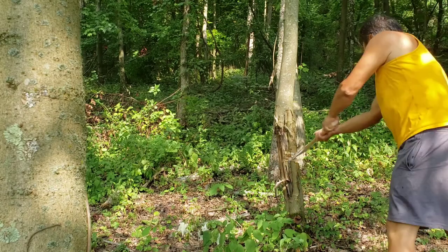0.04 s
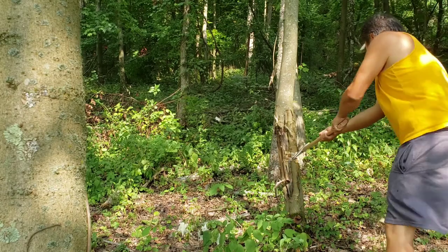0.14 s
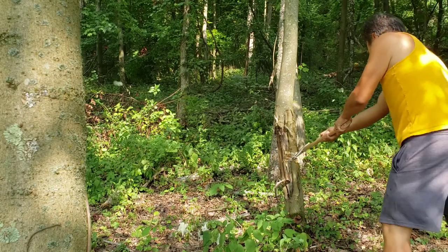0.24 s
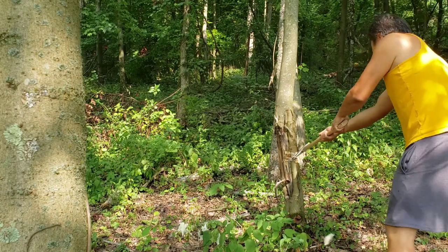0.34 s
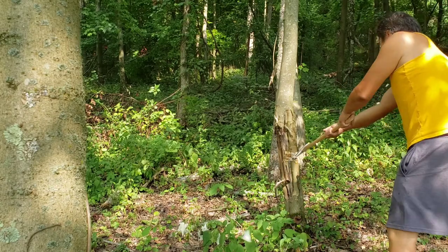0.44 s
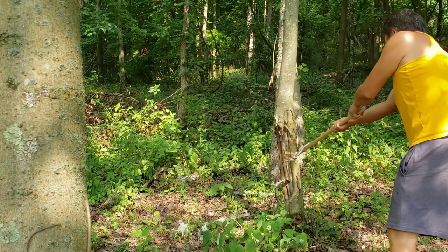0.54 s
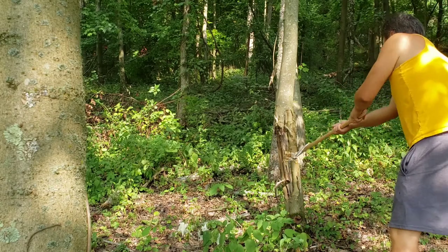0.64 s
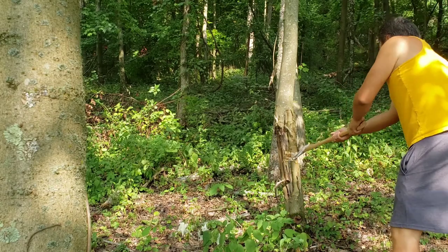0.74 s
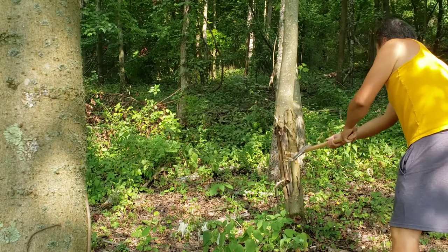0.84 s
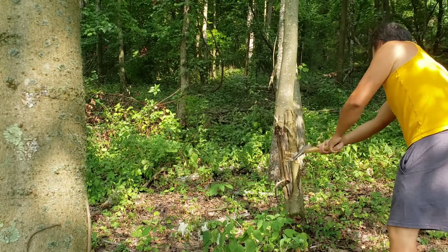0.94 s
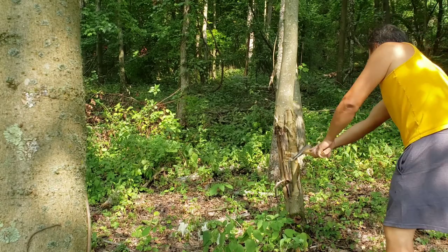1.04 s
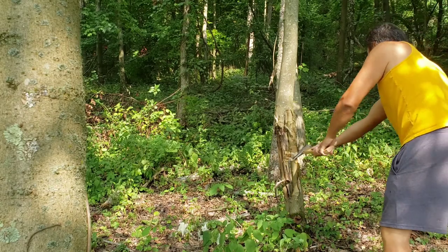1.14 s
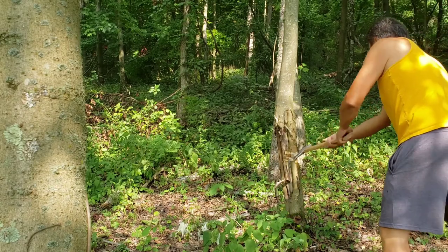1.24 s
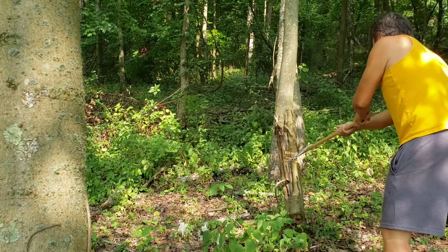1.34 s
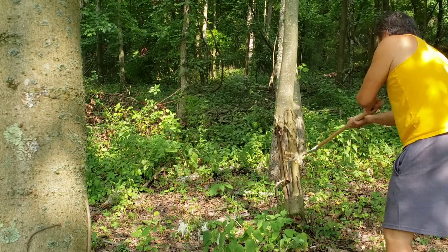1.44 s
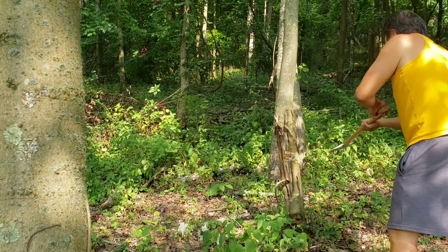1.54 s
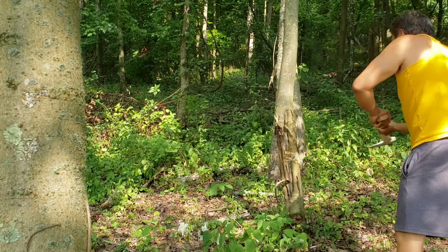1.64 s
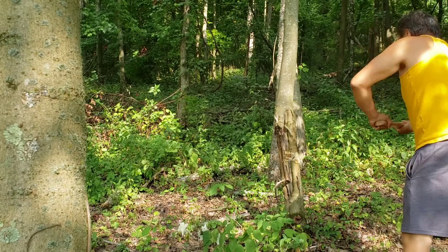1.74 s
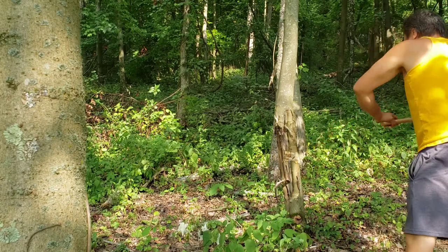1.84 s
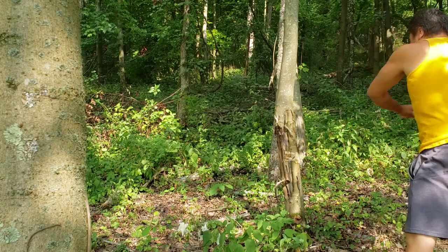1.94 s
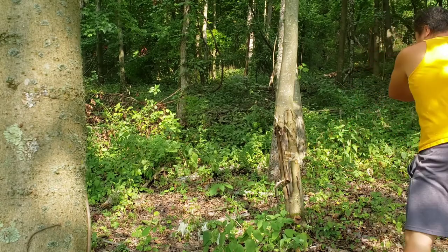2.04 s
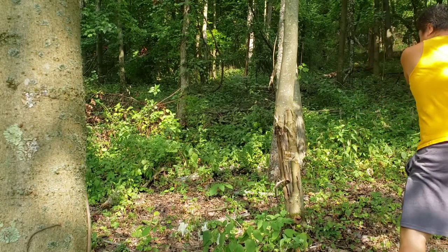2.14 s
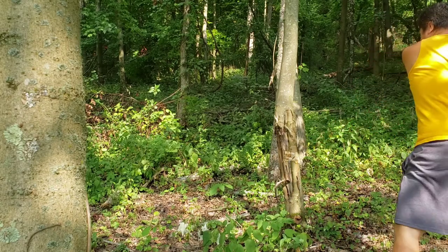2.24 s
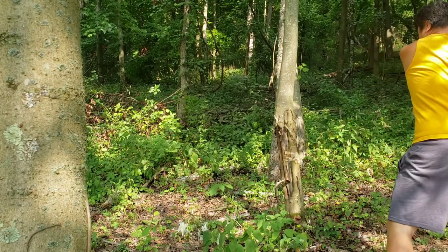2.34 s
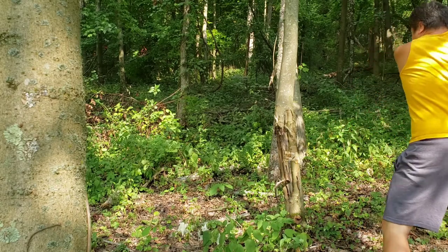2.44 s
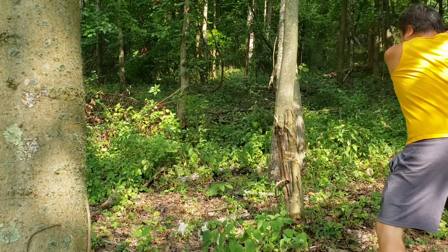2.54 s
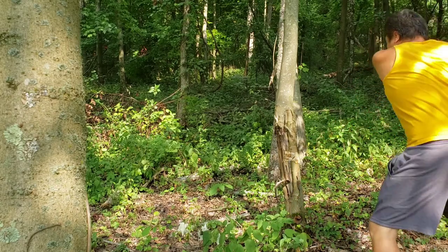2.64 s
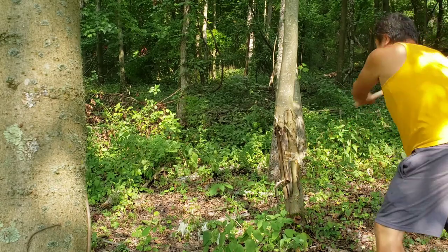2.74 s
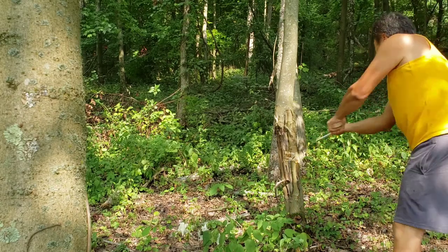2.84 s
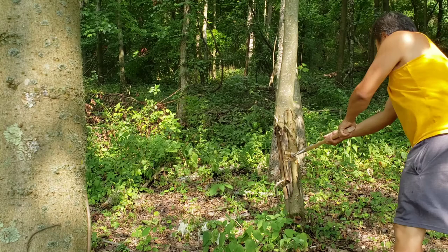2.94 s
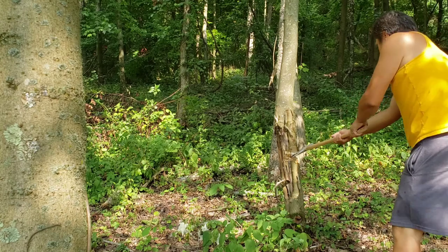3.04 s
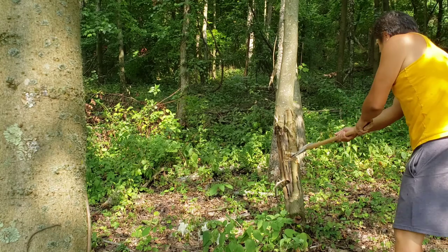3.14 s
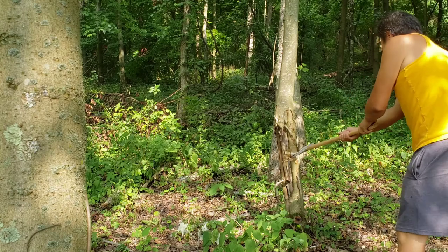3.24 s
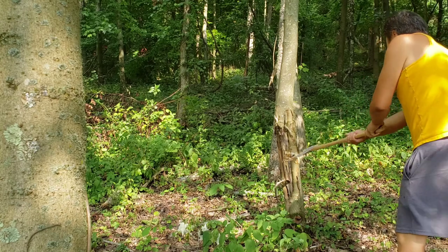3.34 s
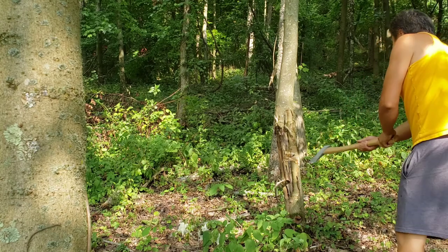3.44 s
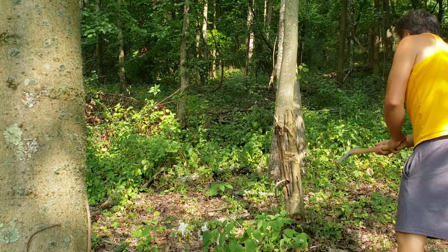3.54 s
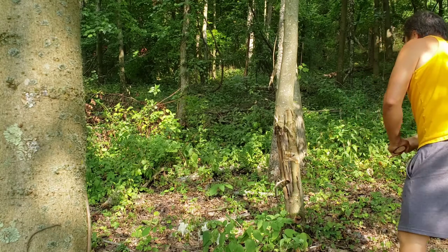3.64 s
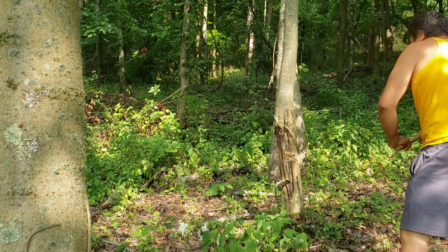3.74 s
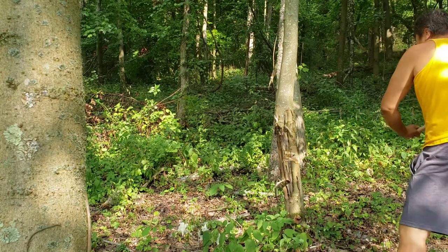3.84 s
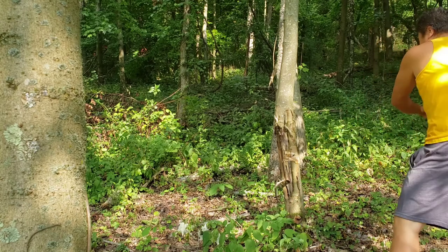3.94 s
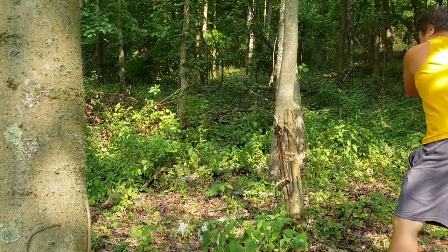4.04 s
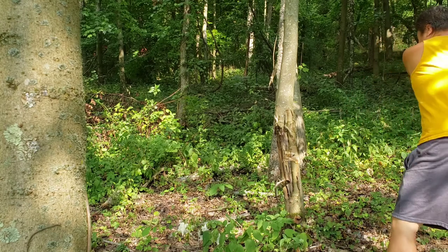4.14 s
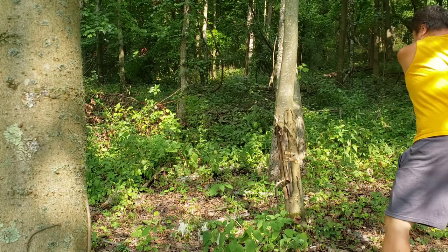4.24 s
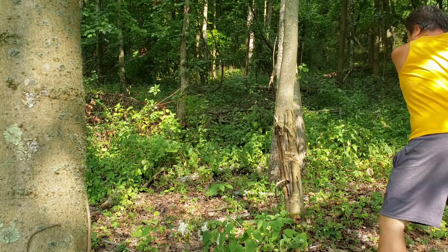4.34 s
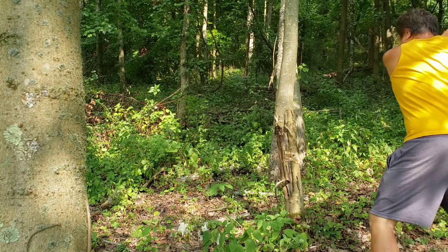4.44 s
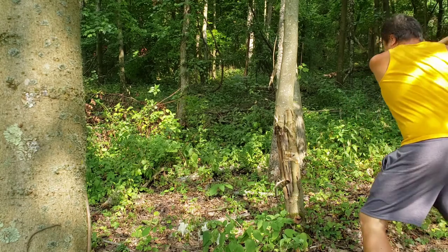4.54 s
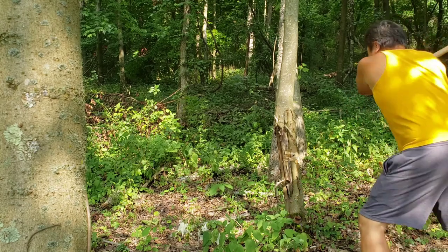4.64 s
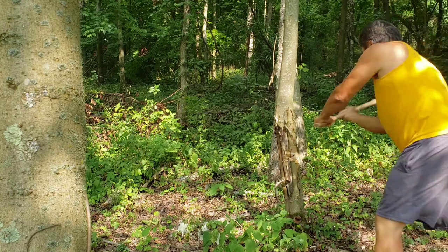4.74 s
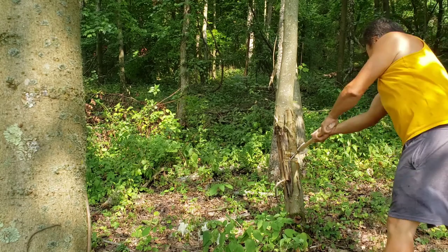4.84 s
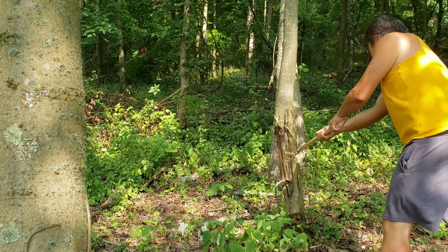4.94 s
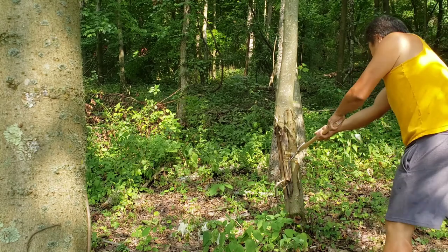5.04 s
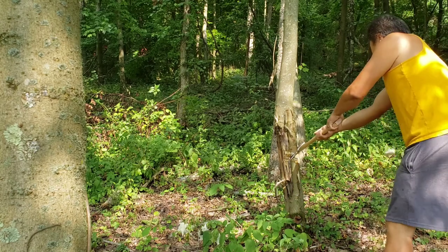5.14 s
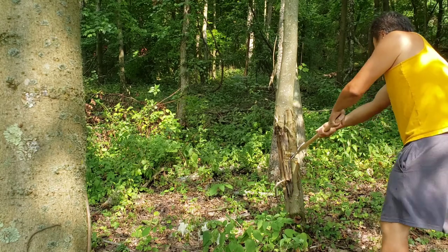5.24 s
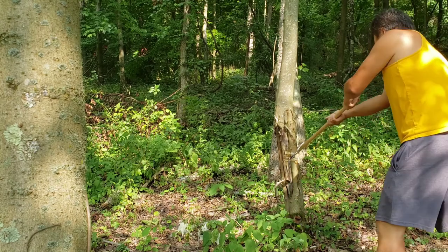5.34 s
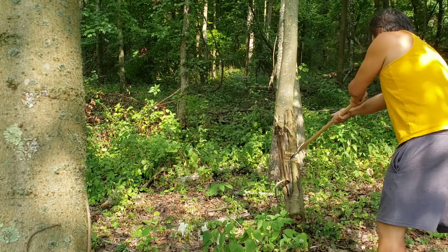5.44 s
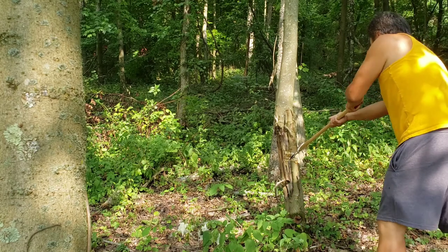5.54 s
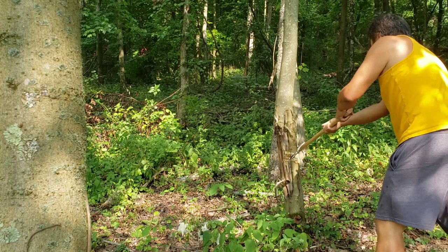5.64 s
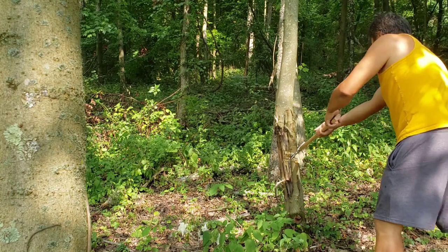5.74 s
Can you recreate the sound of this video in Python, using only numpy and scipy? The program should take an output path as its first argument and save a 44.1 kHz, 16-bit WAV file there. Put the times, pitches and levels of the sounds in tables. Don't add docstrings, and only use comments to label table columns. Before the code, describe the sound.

Three sharp axe chops into a thin trunk, spaced two to three seconds apart, echoing through quiet woods with faint leaf rustles between.

```python
import sys
import numpy as np
from scipy import signal
from scipy.fft import rfft, irfft
from scipy.io import wavfile
from scipy.ndimage import uniform_filter1d

SR = 44100
rng = np.random.default_rng(int(sys.argv[2]) if len(sys.argv) > 2 else 0)


def voltage_ratio(level):
    return 10 ** (np.asarray(level, float) / 20)


def unload_wav(signal):
    wavfile.write(
        sys.argv[1],
        SR,
        np.round(np.clip(np.atleast_2d(signal).T, -1, 1) * 32767).astype(np.int16),
    )


N = 254898


def evened(x):
    return x / np.sqrt(np.mean(x ** 2) + 1e-20)


def read(points, hz, col=1):
    table = np.transpose(points)
    return np.interp(np.log(hz + 1), np.log(table[0] + 1), table[col])


def tilt(hz, db_per_octave, pivot_hz):
    return db_per_octave * np.log2(np.clip(hz, 300, None) / pivot_hz)


def add(mix, s, sound):
    part = mix[..., round(s * SR):][..., :sound.shape[-1]]
    part += sound[..., :part.shape[-1]]


# frequency [Hz], left-right likeness [-1 to 1].
LIKENESS = [(60, 0.95), (180, 0.82), (550, 0.29), (1650, -0.025), (4970, 0.2), (15000, 0.03)]


def pair(size, length, lean):
    frames, hz = 4 * length // size + 5, np.fft.rfftfreq(size, 1 / SR)
    a, b, c, d = rng.standard_normal((frames, len(hz), 4)).T
    same = np.clip(read(LIKENESS, hz), -1, 1)[:, None]
    left = a + 1j * b
    right = same * left + np.sqrt(1 - same ** 2) * (c + 1j * d)
    side = voltage_ratio(read(lean, hz) / 2)[:, None]
    return hz, np.arange(frames) * size / 4 / SR, np.array([left * side, right / side])


def sound_of(z, length):
    size = 2 * (z.shape[-2] - 1)
    return signal.istft(z, nperseg=size, noverlap=3 * size // 4)[1][..., :length]


def patchy(shape, bins, frames):
    over_hz = uniform_filter1d(rng.standard_normal(shape), bins, 0)
    return evened(uniform_filter1d(over_hz, frames, 1))


def burst(db, rise, t60, colour_db, alike):
    t, alike = np.arange(8192) / SR - 1 / 100, np.clip(alike, 0, 1)
    a, b = rng.standard_normal((2, 8192))
    noise = np.array([a, alike * a + np.sqrt(1 - alike ** 2) * b])
    shape = np.where(t < 0, np.clip(1 + t / rise, 0, 1) ** 2, voltage_ratio(-60 * t / t60))
    return voltage_ratio(db) * evened(irfft(rfft(noise) * voltage_ratio(colour_db))) * shape


# frequency [Hz], density [dB per Hz].
HUSH = [(150, -31), (250, -5), (500, -12), (1000, -14), (1600, -17.5), (2800, -21), (6000, -27),
        (7700, -25), (9000, -31), (12000, -31), (16000, -28)]
# frequency [Hz], left minus right [dB].
AIR_LEAN = [(60, 9), (180, 8), (550, 3.5), (1650, 2.5), (4970, 1.5), (15000, -2)]


def air():
    hz, _, z = pair(1024, N, AIR_LEAN)
    colour_db = read(HUSH, hz)[:, None] + 1.0 * patchy(z.shape[1:], 14, 12)
    return voltage_ratio(-80) * evened(sound_of(z * voltage_ratio(colour_db), N))


# frequency [Hz], density [dB per Hz].
GUST = [(12, -40), (20, -12.5), (47, -3.5), (70, 1), (125, -10.5), (151, -15.5), (238, -22.5), (367, -40.5),
        (500, -40), (650, -66.5), (1100, -120)]
# time [s], level [dB].
LULLS = [(0.3, -62), (0.59, -64), (1.07, -62), (1.34, -67), (1.56, -67), (1.7, -62), (2.06, -65),
         (2.35, -59), (2.78, -61), (2.98, -58), (3.67, -69), (4.09, -65), (4.18, -68), (4.46, -70),
         (5.02, -60), (5.13, -67), (5.26, -69), (5.7, -66)]


def breeze():
    hz, _, z = pair(2048, N, AIR_LEAN)
    lumps = evened(uniform_filter1d(rng.standard_normal(N), 2500))
    gusty_db = 4.5
    level_db = np.interp(np.arange(N) / SR, *np.transpose(LULLS)) + gusty_db + 2.4 * lumps
    return voltage_ratio(level_db) * evened(sound_of(z * voltage_ratio(read(GUST, hz))[:, None], N))


# frequency [Hz], level [dB].
LEAF = [(1000, -24), (3000, -18.5), (6000, -11), (9000, -1), (12000, -0.2), (16000, -2)]
# time at full level [s], rise [s], hold [s], level [dB].
RUSTLES = [(.01, .02, .02, -75), (.36, .08, .18, -69), (.678, .08, .005, -72), (.79, .015, .075, -66),
           (.924, .012, .005, -62), (.98, .05, .05, -75), (1.1, .1, .04, -83), (1.432, .16, .01, -73),
           (1.666, .05, .003, -82), (1.818, .008, .03, -66), (1.9, .02, .05, -70), (2.2, .03, .003, -82),
           (2.308, .02, .003, -81), (2.4, .4, .25, -84), (2.68, .015, .005, -78), (2.7, .05, .17, -80),
           (3.25, .04, .003, -69), (3.306, .015, .04, -61.5), (3.474, .04, .003, -73),
           (3.578, .03, .003, -75), (3.758, .03, .015, -72), (4.03, .12, .03, -82), (4.122, .05, .02, -76),
           (4.58, .06, .25, -77), (5.16, .1, .08, -74), (5.283, .03, .07, -74), (5.432, .025, .004, -71),
           (5.466, .03, .03, -65.5)]


def leaves():
    hz, t = np.linspace(0, SR / 2, 257), np.arange(N) / SR
    snaps_per_s, blur_s = 900, .0027
    size = voltage_ratio(3.7 * np.minimum(rng.exponential(1, N), 5)) * (rng.random(N) < snaps_per_s / SR)
    clumps = evened(signal.lfilter([1], [1, -np.exp(-1 / (blur_s * SR))], size)) + 1.6
    colour = signal.firwin2(255, hz, voltage_ratio(read(LEAF, hz)), fs=SR)
    hiss = evened(signal.oaconvolve(clumps * rng.standard_normal((N, 2)).T, colour[None], "same"))
    rise_db, settle_db_per_s = 28, 175
    level = np.zeros(N)
    for s, rise, hold, db in RUSTLES:
        before, after = np.maximum(s - t, 0), np.maximum(t - s - hold, 0)
        level += voltage_ratio(db - rise_db * before / rise - settle_db_per_s * after)
    return voltage_ratio(-8) * hiss * uniform_filter1d(level, 60)


def tick(db, tick_hz, spread, t60):
    hz = np.fft.rfftfreq(8192, 1 / SR)
    octaves = np.log2(hz / tick_hz + 1e-9)
    return burst(db, .0007, t60, np.maximum(-6 * (octaves / spread) ** 2, -60), .4)


# time [s], level [dB], pitch [Hz], left minus right [dB].
SNAPS = [(.253, -59, 11000, 2), (.406, -72, 11000, -4), (.487, -72, 11000, -8), (.830, -53, 10500, 10.5),
         (.923, -67, 11000, 9), (1.818, -69, 12000, -2), (1.902, -73, 11000, 3), (1.952, -75, 12000, -5.5),
         (3.302, -68, 12000, 7), (3.457, -73.5, 8980, 4), (3.545, -76, 9520, -7), (3.574, -75, 9000, -5),
         (3.643, -77, 9200, 2), (3.760, -73, 11000, -2), (4.102, -74, 11000, .3), (5.283, -70, 11500, .3),
         (5.432, -74, 11000, .3), (5.465, -73, 11000, -3.6)]
# time [s], level [dB], pitch [Hz], spread [octaves], t60 [s].
CHIPS = [
    (.1754, -33.5, 620, 1.5, .012),
    (.830, -70, 5000, .8, .012),
    (1.663, -77, 5500, .66, .015),
    (2.682, -69, 4500, 1.3, .012),
    (2.7045, -53.5, 1000, 1.8, .01),
    (2.69, -76, 2800, .8, .15),
    (4.12, -75.5, 901, 1.16, .1),
    (4.62, -66, 230, .25, .08),
    (5.466, -72, 740, .5, .22),
    (5.467, -79, 2900, .28, .15),
]


def twigs():
    out, apart = np.zeros((2, N)), np.array([[.5], [-.5]])
    for s, db, hz, pan_db in SNAPS:
        add(out, s - 1 / 100, tick(db, hz, .52, .018) * voltage_ratio(apart * pan_db))
    for s, db, hz, spread, t60 in CHIPS:
        add(out, s - 1 / 100, tick(db, hz, spread, t60) * voltage_ratio(apart * read(TRUNK_LEAN, hz)))
    return out


# frequency [Hz], near trees level [dB] and t60 [s],
# deep wood level [dB] and t60 [s].
WOOD = [(35, -22, .2, -30, .4), (70, -3, .22, -8, .5), (202, -15, .2, -25, 0.55), (600, -17, 0.27, -25, .5),
        (1500, -20, .2, -27, .55), (2800, -21.5, 0.3, -28, .6), (4500, -24, .22, -32.5, .55),
        (7000, -29.5, 0.29, -36, .56), (11000, -34, 0.33, -41.5, 0.59), (16000, -37, .25, -42, .52)]


def trees(db, bright_db, bands, gap_s=0.0059):
    hz, t, z = pair(512, SR, TRUNK_LEAN)
    hz = hz[:, None]
    flat = np.std(sound_of(z, SR))
    near, deep = (voltage_ratio(read(WOOD, hz, col) - 60 * t / read(WOOD, hz, col + 1)) ** 2 for col in (1, 3))
    power = (near + deep) * voltage_ratio(tilt(hz, bright_db, 2000)) ** 2
    for centre_hz, width_hz, band_db, t60, last_s in bands:
        fade_db = band_db - 60 * t / t60 - 105 * np.maximum(t - last_s, 0)
        power = power + voltage_ratio(fade_db) ** 2 * np.exp(-((hz - centre_hz) / width_hz) ** 2)
    clumps = patchy(power.shape, 8, 9)
    tail = sound_of(z * np.sqrt(power) * voltage_ratio(db + 20.6 + 2.6 * clumps), SR) / flat
    return tail * np.clip(np.arange(SR) / SR / gap_s - .6, 0, 1)


def ring(hz, db, t60, sag=.12, rough=.25):
    t = np.arange(SR // 4) / SR
    rise = .0003 + .72 / hz
    turns = hz * (t + sag * .004 * (1 - np.exp(-t / .004)))
    flutter = 1 + rough * evened(uniform_filter1d(rng.standard_normal(len(t)), int(SR / hz) + 1))
    swell = (1 - np.exp(-t / rise)) ** 2
    return voltage_ratio(db - 60 * t / t60) * swell * flutter * np.sin(2 * np.pi * turns)


# frequency [Hz], level [dB].
CRACKLE = [(200, -2.5), (1000, -2.5), (3000, -1.5), (6000, -7), (8000, -11), (10500, -7), (16000, -14)]


def crack(db, rise, t60, bright_db):
    hz = np.fft.rfftfreq(8192, 1 / SR)
    return burst(db, rise, t60, read(CRACKLE, hz) + tilt(hz, bright_db, 4000), .68)


# frequency [Hz], left minus right [dB].
TRUNK_LEAN = [(80, 5), (400, 3.5), (1200, 3.5), (3000, 4.5), (6000, -0.3), (10000, -0.2)]


def direct(x):
    hz = np.fft.rfftfreq(x.shape[-1], 1 / SR)
    side, lag_s = voltage_ratio(read(TRUNK_LEAN, hz) / 2), .000104
    later = np.exp(-2j * np.pi * np.minimum(hz * lag_s, 1))
    return irfft(rfft(x) * np.array([side * later, 1 / side]), x.shape[-1])


# start [s], pitch [Hz], level [dB], t60 [s].
RINGS = [
    [(.0482, 2260, -8.5, .014), (.048, 1400, -9, .011), (.050, 3900, -18, .02), (.049, 190, -20, .06),
     (.054, 589, -19, .064), (.055, 279.3, -18, .08), (.056, 107.8, -20.5, .15), (.052, 72, -12.5, .15),
     (.063, 2330, -20, .035), (.050, 950, -20, .03)],
    [(2.8984, 1620, -7.5, .017), (2.8985, 1100, -16, .033), (2.903, 930, -15.5, .045),
     (2.903, 466, -20, .07), (2.905, 680, -19, .07), (2.904, 210, -18, .1), (2.899, 112, -12, .12),
     (2.9027, 76, -9, .15), (2.899, 3200, -21, .03)],
    [(4.840, 1180, -8.5, .022), (4.842, 1900, -20, .03), (4.846, 900, -12.5, .039),
     (4.8445, 460, -16.5, .06), (4.852, 682, -17, .06), (4.846, 175, -8.5, .069), (4.846, 110, -12.5, .17),
     (4.850, 78, -11.5, .19), (4.842, 3060, -24, .05)],
]
# peak [s], level [dB], rise [s], t60 [s],
# brightness [dB an octave].
CRACKS = [
    [(.0494, -18, .0055, .013, 0.2), (.0495, -17, .002, .012, -3.5), (.058, -25, .003, .06, -8),
     (.063, -28, .008, .08, -4)],
    [(2.8986, -38, .006, .01, 0), (2.899, -15, .0018, .008, 0.2), (2.900, -18, .001, .04, -6),
     (2.905, -21, .002, .012, -12), (2.908, -26, .004, .07, -8), (2.912, -29, .006, .09, -3.5)],
    [(4.8402, -24, .0025, .01, -2.5), (4.8435, -23, .002, .012, -0.5), (4.842, -21, .002, .03, -5),
     (4.850, -22, .003, .07, -8), (4.852, -34, .006, .07, -4.5)],
]
# time [s], level [dB], brightness [dB an octave].
SENT = [
    (.049, -22.5, .7),
    (2.899, -21, 0.8),
    (4.841, -23.5, -1.5),
]
# centre [Hz], width [Hz], level [dB],
# t60 [s], last echo [s].
LINGER = [
    [(2350, 190, -27, .88, .5), (1850, 150, -32, .8, .42), (190, 30, -21, .9, .25)],
    [(1740, 95, -28.5, .97, .56), (930, 110, -31, .95, .44), (1500, 100, -34, 1.1, .45),
     (6500, 1200, -42, .7, .45)],
    [(3120, 120, -29, .85, .38), (1300, 500, -33, .95, .5), (782, 130, -33, .9, .38),
     (12500, 4000, -46, .7, .4)],
]


def axe():
    out = np.zeros((2, N))
    for rings, cracks, (struck_s, *sent), bands in zip(RINGS, CRACKS, SENT, LINGER):
        start, chop = rings[0][0] - 1 / 40, np.zeros((2, 16384))
        for s, *mode in rings:
            add(chop, s - start, ring(*mode))
        for s, *tear in cracks:
            add(chop, s - start - 1 / 100, crack(*tear))
        add(out, start, direct(chop))
        add(out, struck_s, trees(*sent, bands))
    return out


def scene():
    return air() + breeze() + leaves() + twigs() + axe()


def low_pass(x):
    return signal.sosfilt(signal.butter(12, 16990, fs=SR, output="sos"), x)


# frequency [Hz], gain [dB].
MICROPHONE = [(100, 0.48), (6000, 0.9), (7700, -7), (8400, 0), (9300, 9.5), (11500, 12.5), (14000, 11),
              (15700, 9), (16150, -25)]


def record(dry):
    hz = np.linspace(0, SR / 2, 1025)
    colour = signal.firwin2(511, hz, voltage_ratio(read(MICROPHONE, hz)), fs=SR)
    cut = signal.sosfilt(signal.butter(2, 47, "high", fs=SR, output="sos"), dry)
    mix = signal.oaconvolve(cut, colour[None], "same")
    return low_pass(mix)


dry = scene()
out = record(dry)
unload_wav(out)
```